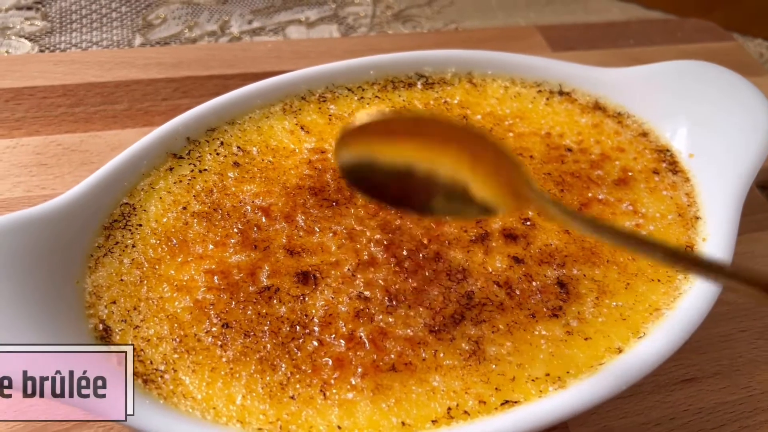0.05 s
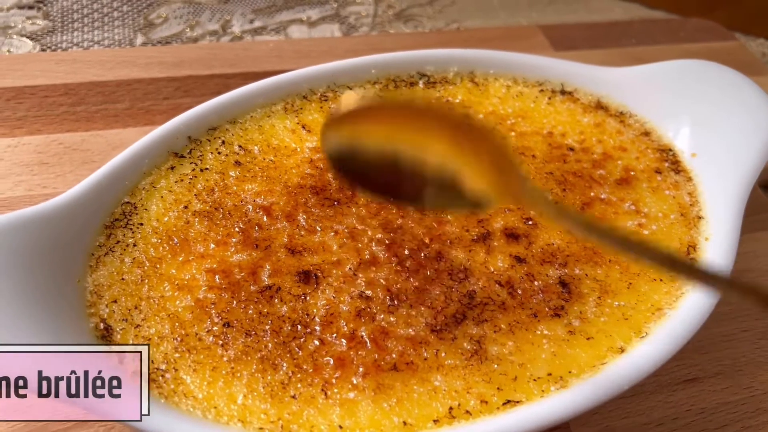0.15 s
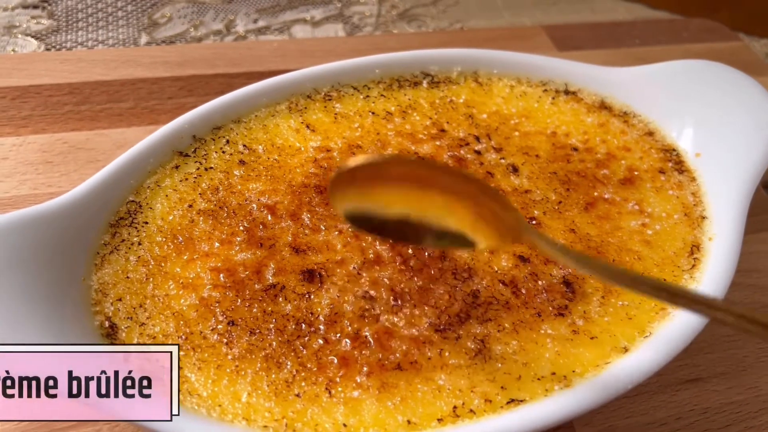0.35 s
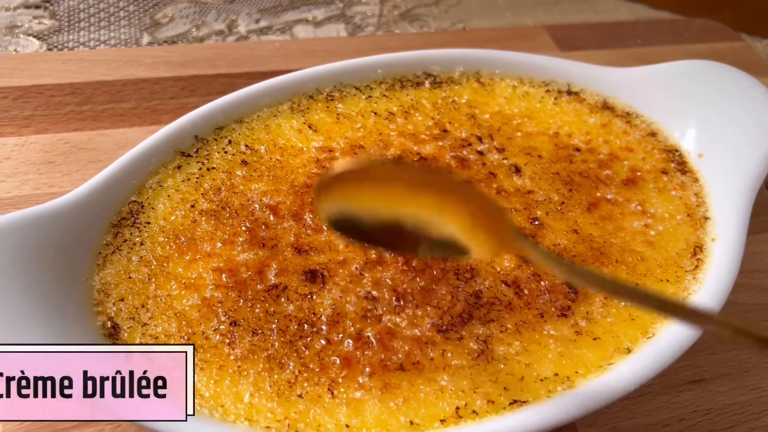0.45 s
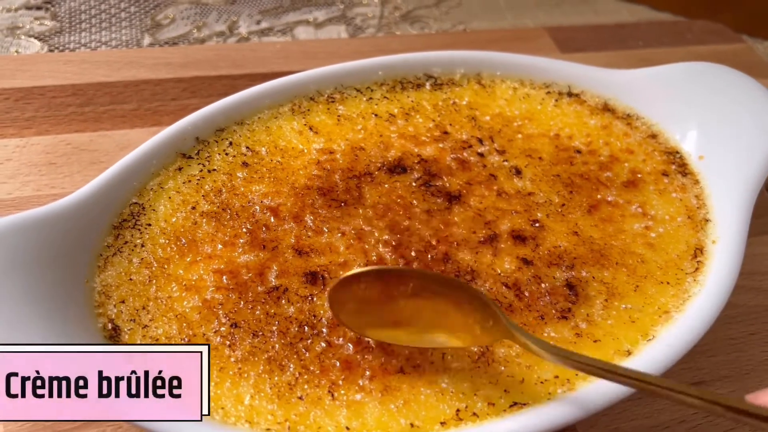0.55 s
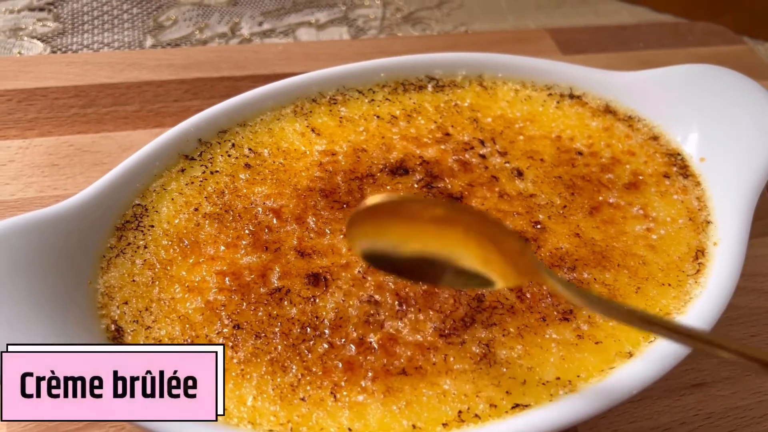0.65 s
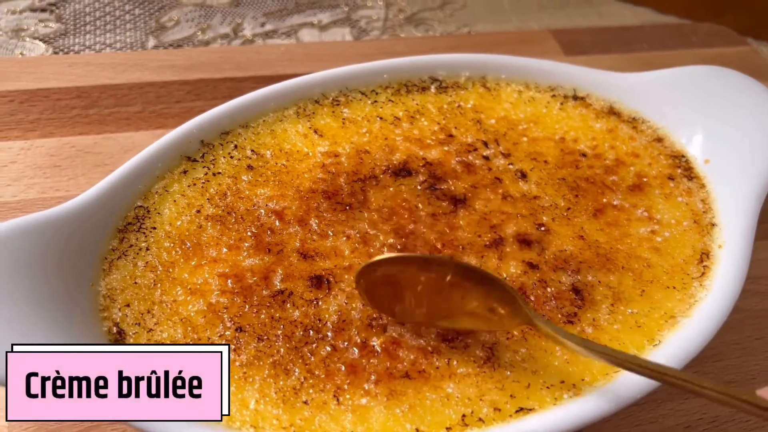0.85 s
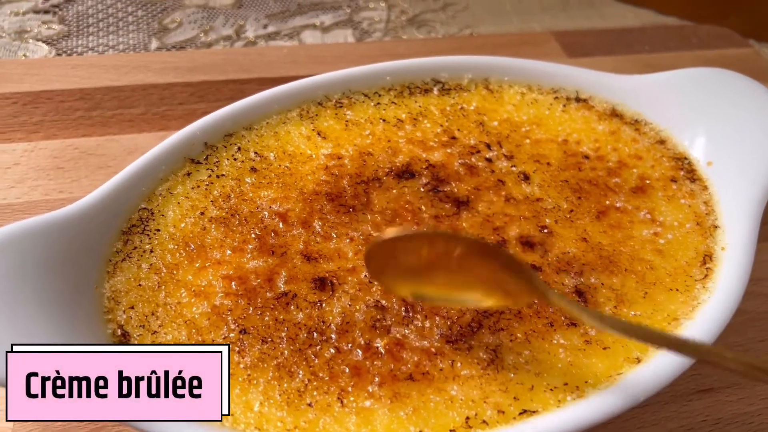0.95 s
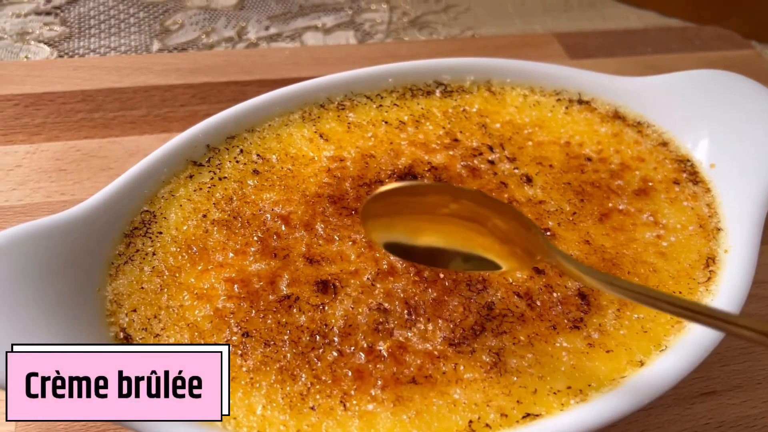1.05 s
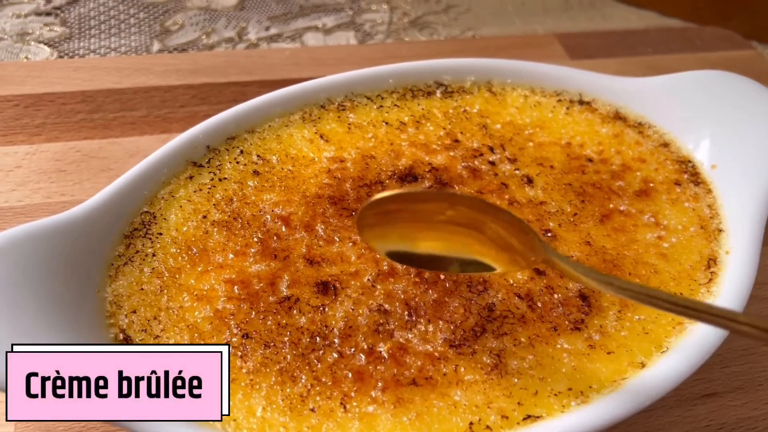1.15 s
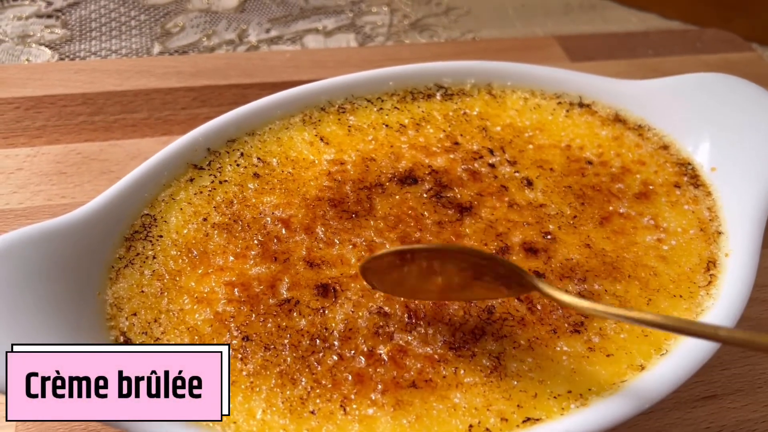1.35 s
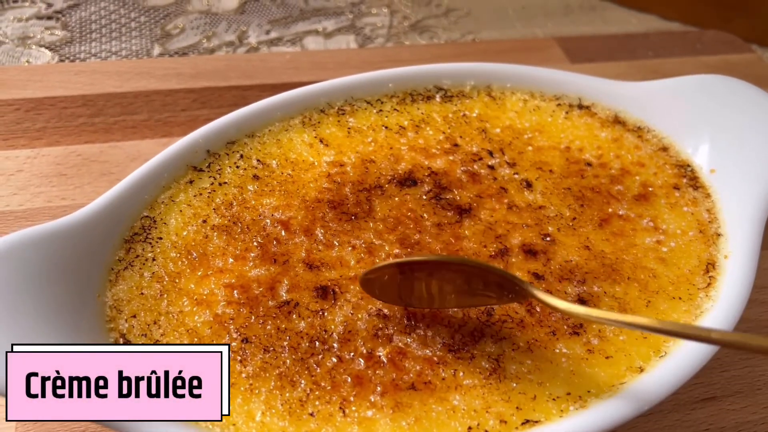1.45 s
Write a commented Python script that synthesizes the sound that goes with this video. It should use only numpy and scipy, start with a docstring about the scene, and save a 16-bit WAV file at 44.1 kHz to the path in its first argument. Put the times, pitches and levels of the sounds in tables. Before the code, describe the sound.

Close by in a quiet kitchen, a spoon strikes a dessert's hardened sugar top: three crisp, hollow taps that thud through the wooden table, then a much softer one. Faint rubbing comes between them, and the room rings briefly.

```python
"""A quiet kitchen: a metal spoon taps the hard caramel crust of a custard dish on a wooden table.
Three firm taps and a light one follow the fading tail of a tap made just before the start.
Each is a bright tick of metal on sugar, a hollow knock of crust and dish, and a low thud that
builds up in the table. A near wall throws back one echo and the room rings briefly.
Something rubs faintly between taps, over a soft rumble and hum."""
import sys
import numpy as np
from scipy import signal
from scipy.io import wavfile

SR = 44100
rng = np.random.default_rng(int(sys.argv[2]) if len(sys.argv) > 2 else 0)


def persist_wave(psi):
    """Save psi, clipped to +-1, as 16-bit WAV."""
    counts = np.round(np.clip(psi, -1, 1) * 32767).astype(np.int16)
    wavfile.write(sys.argv[1], SR, np.atleast_2d(counts).T)


N = 66150
TIME = np.arange(N) / SR
TREBLE_FROM_HZ = 3500   # above this the room answers the tick, below it the knock

# the taps and how strong each part is:
# t/s, crust/dB, dish/dB, tick/dB, treble limit/Hz, thud/dB, boom/dB, spoon ring/dB, room/dB
TAPS = [(-0.115, -2, -2, -4, 9100, 11, 6.5, -14, -1.5), (0.2081, 1, -3, -1, 17000, 3, 0, -15, 2),
        (0.5124, -2, -0.5, -1, 17000, 0, -2, -3.5, -1), (0.8324, -3, -5, -2, 11200, -3.5, -3.5, -15, -4.5),
        (1.4000, -23.5, -23, -22.5, 7170, -14.5, -14.5, -25, -22)]
# how alike the room's sound is on the left and right: f/Hz, likeness (1 the same, 0 unrelated)
LIKENESS = [(60, 0.96), (130, 1), (290, 1), (640, .2), (1400, 0)]


def from_db(db):
    """Turn decibels into a factor to multiply by."""
    return 10 ** (np.asarray(db) / 20)


def pan(db):
    """Left and right factors that make the left side db decibels louder."""
    return from_db(np.array([[db], [-db]]) / 2)


def at_hz(points, hz, column=1):
    """Read a table's column at any frequency, sliding between its rows by pitch."""
    table = np.array(points)
    return np.interp(np.log(hz), np.log(table[:, 0]), table[:, column])


def cut(x, hz, kind, order=2):
    """Keep the "low" or the "high" side of hz; a higher order cuts more steeply."""
    return signal.sosfilt(signal.butter(order, hz, kind, fs=SR, output="sos"), x + 1e-18)


def delay(x, s):
    """Shift a sound later by s seconds (earlier if negative)."""
    shift, index = int(round(s * SR)), np.arange(N)
    return np.roll(x, shift, axis=-1) * ((index >= shift) & (index < N + shift))


def dying(fade_s):
    """A fade that drops 60 dB in fade_s seconds, the "fade" of the tables."""
    return np.exp(-np.minimum(np.log(1000) * TIME / fade_s, 40))


def swell(t, rise_s):
    """A smooth rise from 0 to 1 that starts at t = 0."""
    return 1 - np.exp(-np.minimum((np.maximum(t, 0) / rise_s) ** 2, 40))


def struck_tone(hz, db, fade_s):
    """One of the pure, fading tones that a thing gives when it is hit."""
    return from_db(db) * np.sin(2 * np.pi * hz * TIME) * dying(fade_s)


def noise_bands():
    """Stereo noise at 0 dB per Hz in slices a third of an octave wide, each with its middle pitch."""
    white = rng.standard_normal((2, 2, N + SR // 4)) * np.sqrt(SR / 2)
    edges = 22 * 2 ** (np.arange(30) / 3)
    for k, (low, high) in enumerate(zip(edges, edges[1:])):
        band = signal.butter(3, [low, high], "band", fs=SR, output="sos")
        common, side = signal.sosfilt(band, white[k % 2])[:, -N:]
        hz = np.sqrt(low * high)
        alike = at_hz(LIKENESS, hz)
        yield hz, (np.sqrt(1 + alike) * common + np.sqrt(1 - alike) * side * [[1], [-1]]) / np.sqrt(2)


def steady_noise(colour):
    """Noise from all around, with its level at each pitch set by a table."""
    return sum(noise * from_db(at_hz(colour, hz)) for hz, noise in noise_bands())


def narrow_noise(hz, width_hz, db):
    """Noise squeezed around one pitch, heard as a wavering tone."""
    band = signal.butter(2, [hz - width_hz / 2, hz + width_hz / 2], "band", fs=SR, output="sos")
    x = signal.sosfilt(band, rng.standard_normal(N + SR // 2))[-N:]
    return from_db(db) * x / x.std()


def kitchen_background():
    """The room's low rumble, faint hiss and wavering hum, there all the time."""
    # rumble and hiss: f/Hz, level/dB per Hz
    quiet_room = [(25, -112), (35, -96), (50, -76), (80, -92.5), (120, -92.5), (190, -102), (310, -102),
                  (450, -112), (700, -117), (1500, -121), (4000, -127), (8500, -130), (11000, -140),
                  (16000, -146)]
    # hum: f/Hz, width/Hz, level/dB
    hum = [(305.7, 30, -82.5), (470.1, 20, -88.5)]
    return steady_noise(quiet_room) + sum(narrow_noise(*row) for row in hum)


def hollow_knock(tones):
    """The tones of something struck through the sugar, which softens the blow."""
    knock = -sum(pan(side) * struck_tone(hz, db, fade_s) for hz, db, fade_s, side in tones)
    knock = cut(knock, 872, "high")
    return delay(cut(knock, 3600, "low", order=4), s=0.0005)


def bright_tick():
    """Metal meets hard sugar: high tones that are gone in a few thousandths of a second."""
    # tones of the contact: f/Hz, level/dB, fade/s, left minus right/dB
    tones = [(5080, -20.5, .004, 11.5), (6400, -20, .0047, -0.5), (7620, -18.5, 0.0082, 4),
             (9102, -15, 0.004, 1.5), (11890, -15, 0.0028, 1), (13900, -22.5, 0.0074, -2.5),
             (15390, -23, 0.0024, 1)]
    tick = sum((-1) ** k * pan(side) * struck_tone(hz, db, fade_s)
               for k, (hz, db, fade_s, side) in enumerate(tones))
    left, right = cut(tick, TREBLE_FROM_HZ, "high")
    return np.array([delay(left, s=0.000295), -right])   # later on the left, upside down on the right


def spoon_ring():
    """The spoon rings on thinly after the hit."""
    # the spoon's tones: f/Hz
    pitches = [7574, 9065, 11410, 13300]
    # for each of those tones: level/dB, fade/s
    fades = [(-45, .17), (-45, .045), (-49, .04), (-49, .13)]
    return sum(struck_tone(hz, db, fade_s) for hz, (db, fade_s) in zip(pitches, fades))


def spoon_on_crust():
    """Every tap is its own mix of crust, dish, tick and spoon ring."""
    # tones of the caramel crust: f/Hz, level/dB, fade/s, left minus right/dB
    crust_tones = [(1706, -31.5, 0.0082, 24), (1920, -36.5, 0.009, 4), (1968, -21.5, 0.012, 26.5)]
    # tones of the dish under it: f/Hz, level/dB, fade/s, left minus right/dB
    dish_tones = [(430, -33.5, 0.038, 0.5), (615, -32.5, 0.056, 6.5), (1199, -40, .045, 1),
                  (1327, -32, 0.054, -0.5), (2183, -26, 0.027, 12.5), (2468, -20.5, 0.009, 14.5),
                  (2667, -19.5, .009, -5), (3270, -28.5, .0085, 7), (3620, -31, 0.02, 3)]
    crust, dish = hollow_knock(crust_tones), hollow_knock(dish_tones)
    tick, ring = bright_tick(), spoon_ring()
    out = 0
    for start, crust_db, dish_db, tick_db, top_hz, _, _, ring_db, _ in TAPS:
        knock = from_db(crust_db) * crust + from_db(dish_db) * dish
        metal = cut(from_db(tick_db) * tick + from_db(ring_db) * ring, top_hz, "low")
        out = out + delay(knock + metal, start)
    return out


def table_thud():
    """The table's low tones build up after each tap and reach the left side first."""
    # the wood's thud: f/Hz, level/dB, fade/s, rise/s
    thud_tones = [(125, -33.5, 0.14, .016), (199.2, -28.5, 0.1, 0.012), (253.7, -42.5, .25, 0.0098),
                  (305.2, -31.5, .11, 0.012), (319.4, -56, 0.4, 0.049), (471, -40, 0.098, .008)]
    # its deep boom: f/Hz, level/dB, fade/s, rise/s
    boom_tones = [(45.26, -32, 0.42, 0.035), (74.3, -34.5, .3, 0.035)]
    thud, boom = (sum(struck_tone(*tone) * swell(TIME, rise_s) for *tone, rise_s in tones)
                  for tones in (thud_tones, boom_tones))
    left = sum(delay(from_db(thud_db) * thud + from_db(boom_db) * boom, start + 0.002)
               for start, *_, thud_db, boom_db, _, _ in TAPS)
    return np.array([left, delay(left, s=0.00044)])


def wall_echo(taps):
    """A near wall sends the taps back once, softer, duller and a little to the right."""
    return from_db(-15.5) * pan(db=-4) * delay(cut(taps, 7000, "low"), s=0.011)


def reflections(colour, rise_s, pan_db):
    """Many small echoes blur into noise after each tap; each pitch fades at its own speed."""
    out = 0
    for hz, noise in noise_bands():
        answer = noise * swell(TIME, rise_s) * dying(at_hz(colour, hz, column=2))
        answer = answer * from_db(at_hz(colour, hz)) * pan(pan_db * (1 - at_hz(LIKENESS, hz)))
        for start, _, _, tick_db, top_hz, *_, room_db in TAPS:
            tick_gain = from_db(tick_db) / np.hypot(1, (hz / top_hz) ** 2)   # dulled like the tick
            gain = from_db(room_db) if hz < TREBLE_FROM_HZ else tick_gain
            out = out + gain * delay(answer, start)
    return out


def room_ring():
    """Each tap bounces off nearby surfaces at once, then rings around the kitchen."""
    # quick bounces: f/Hz, level/dB per Hz, fade/s
    nearby = [(398, -81.5, .04), (800, -78.5, 0.076), (1290, -60.5, 0.013), (2230, -61, 0.061),
              (2860, -64, 0.013), (4100, -64, 0.013), (5400, -70, .04), (9000, -65, 0.016),
              (12000, -66, 0.01), (15900, -78, 0.073)]
    # the room's longer ring: f/Hz, level/dB per Hz, fade/s
    room = [(102, -66, 0.52), (193, -72.5, .33), (300, -77, 0.6), (425, -80.5, 0.16), (500, -80, .4),
            (615, -98, 0.39), (820, -91.5, 0.5), (1040, -80.5, 0.4), (1130, -77.5, .4), (1450, -80, .42),
            (1870, -73.5, .47), (2720, -80, 0.47), (3530, -92, 0.38), (5500, -88, .39), (9200, -88, 0.25),
            (12000, -94.5, 0.11), (16000, -103, .29)]
    return reflections(nearby, rise_s=0.00033, pan_db=6.5) + reflections(room, rise_s=0.004, pan_db=4)


def rubbing():
    """Each soft rub, off to the left, is a ringing hiss that fades over a thin, lasting tone."""
    # the rubs: t/s, length/s, hiss/dB, tone/dB
    rubs = [(0.662, 0.25, 1.5, -9.5), (1.231, 0.19, 0, -8)]
    # their hiss: f/Hz, level/dB per Hz
    hiss_colour = [(1000, -119), (2200, -117), (3200, -110), (4400, -113), (5600, -108), (6700, -126),
                   (10000, -134)]
    # pitches that the rubbing sets ringing: f/Hz, width/Hz, level/dB
    ringing = [(3170, 320, -80), (3850, 270, -85), (5460, 240, -77.5), (5900, 280, -82)]
    edge_s, fade_db_per_s = 0.033, 67
    hiss = steady_noise(hiss_colour) + sum(narrow_noise(*row) for row in ringing)
    tone = narrow_noise(hz=1830, width_hz=110, db=-76)
    out = 0
    for start, length, hiss_db, tone_db in rubs:
        age = TIME - start
        stroke = swell(age, edge_s) * swell(length - age, edge_s)
        hiss_gain = from_db(hiss_db - fade_db_per_s * np.maximum(age, 0))
        out = out + stroke * (hiss_gain * hiss + from_db(tone_db) * tone)
    return pan(db=9.5) * out


def scene():
    """The taps, the table and the kitchen around them."""
    taps = spoon_on_crust()
    return taps + wall_echo(taps) + table_thud() + room_ring() + rubbing() + kitchen_background()


def record(dry):
    """Soften the deepest rumble and the highest treble, then cut steeply above 16900 Hz."""
    softened = cut(cut(dry, 46, "high", order=4), 16200, "low")
    return signal.sosfilt(signal.ellip(10, .1, 80, 16900, fs=SR, output="sos"), softened)


dry = scene()
out = record(dry)
persist_wave(out)
```